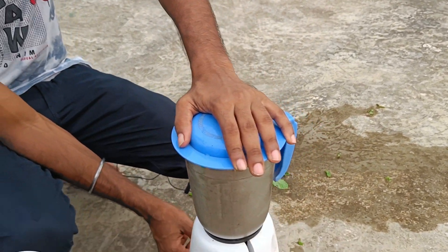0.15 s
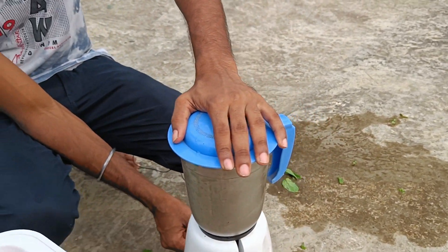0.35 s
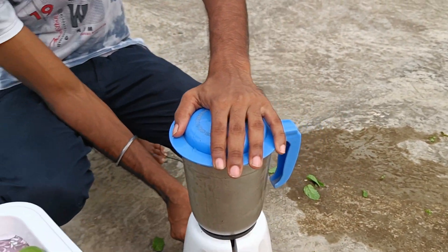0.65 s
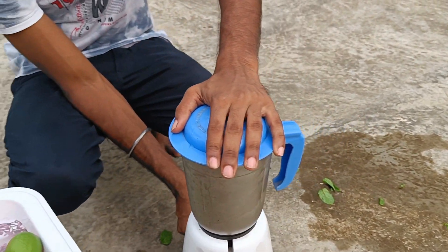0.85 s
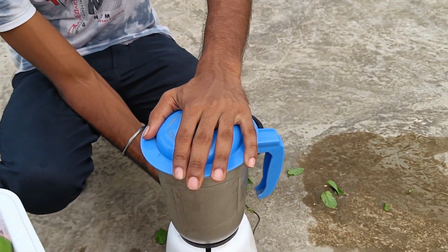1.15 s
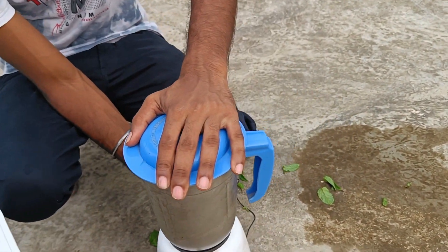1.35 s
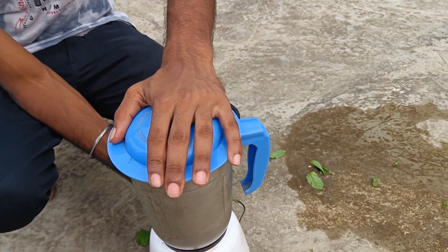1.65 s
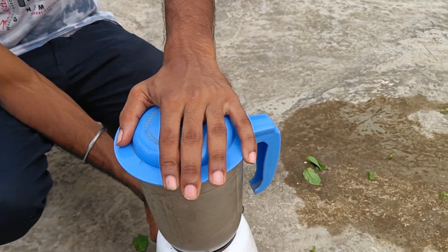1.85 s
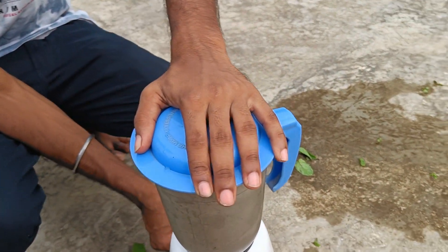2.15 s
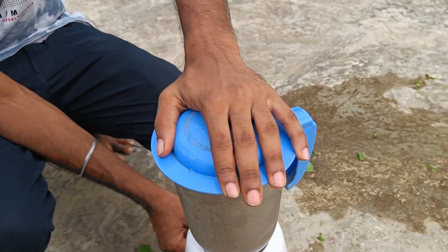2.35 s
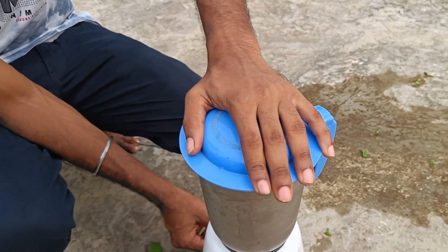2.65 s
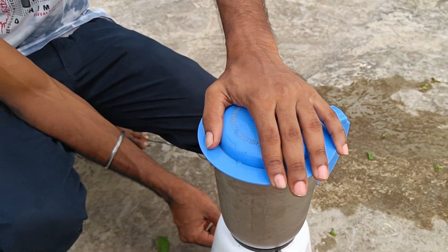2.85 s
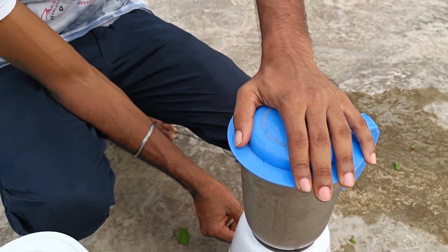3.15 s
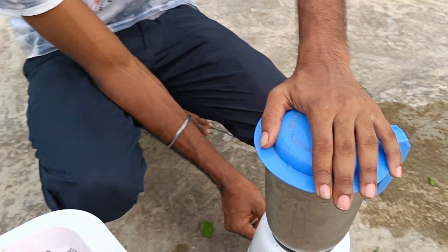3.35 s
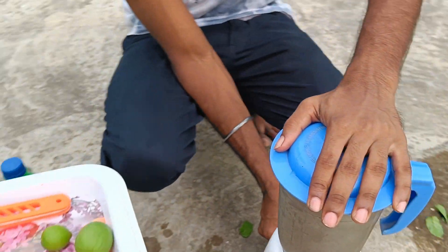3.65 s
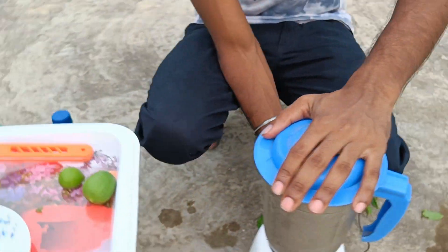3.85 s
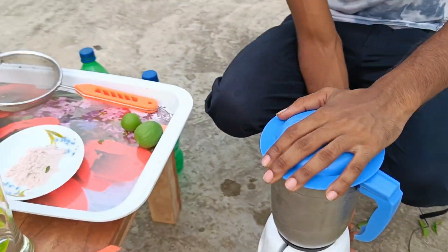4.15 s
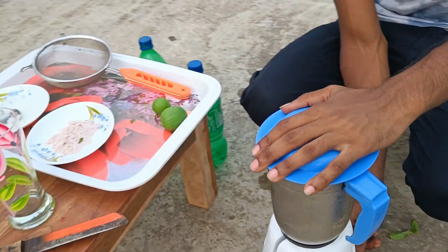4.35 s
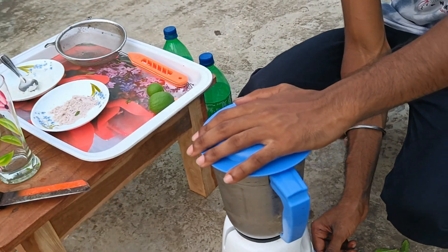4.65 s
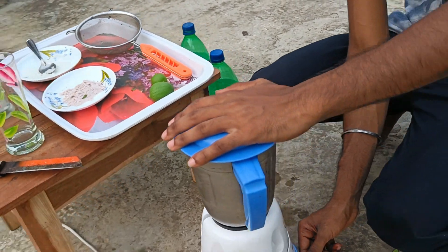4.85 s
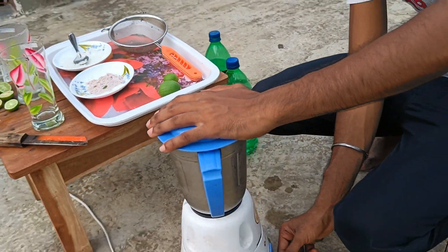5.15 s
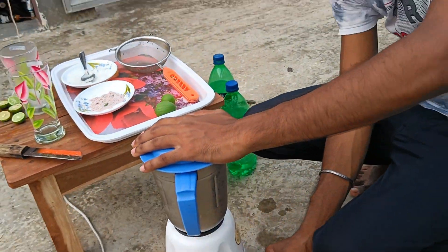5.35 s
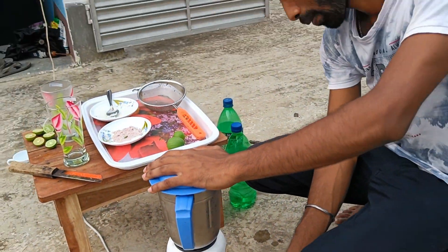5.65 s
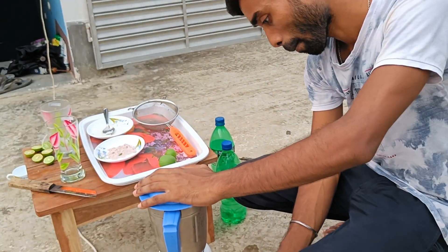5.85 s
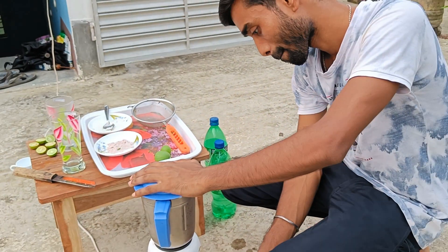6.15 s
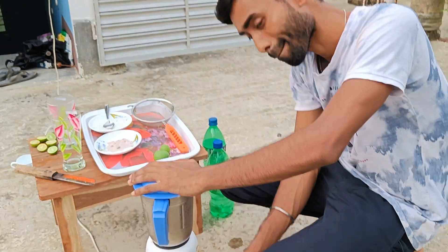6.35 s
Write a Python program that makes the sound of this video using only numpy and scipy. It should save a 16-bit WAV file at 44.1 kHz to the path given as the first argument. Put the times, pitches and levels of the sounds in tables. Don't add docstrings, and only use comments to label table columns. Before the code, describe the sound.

A mixer grinder is already at full speed, close to the microphone in an open yard. A harsh, high motor whine wavers about eight times a second over a dense wet churn and hiss. Ice snaps and chips tick on the steel jar. The mix turns smoother near four seconds, the sound recedes, and a tiny gap comes late.

```python
import sys
import numpy as np
from scipy import signal
from scipy.fft import rfft, irfft
from scipy.io import wavfile
from scipy.ndimage import uniform_filter1d, minimum_filter1d

SR = 44100
rng = np.random.default_rng(int(sys.argv[2]) if len(sys.argv) > 2 else 0)


def how_loud(loudness_db):
    steps = np.asarray(loudness_db, float) / 20
    return 10 ** steps


def master_out(mix):
    frames = np.transpose(np.atleast_2d(mix))
    ceiling = np.clip(frames, -1, 1)
    pcm = np.round(ceiling * 32767).astype(np.int16)
    wavfile.write(sys.argv[1], SR, pcm)


N = 286322
TIME_S = np.arange(N) / SR

# time in seconds, speed in Hz.
SPEED = [(0, 225.5), (.57, 223), (1.29, 222.7), (1.63, 219.8), (1.8, 216.3), (2.29, 214.3), (2.85, 214.3),
         (3.08, 212.7), (3.63, 214.2), (3.95, 214.6), (4.18, 210.5), (4.75, 211.5), (5.15, 209.9),
         (5.4, 207.2), (5.73, 210.4), (6.12, 211.5), (6.3, 207.5), (6.49, 208)]
# lowest speed at in seconds, laps so far, speed swing in Hz, churn swell in dB.
SWIRL = [(-.1, -1, 8.2, 1), (.055, 0, 8.2, 1), (.678, 4, 8.2, .5), (1.527, 10, 7.4, 3.5),
         (1.776, 12, 6.9, 4.2), (2.145, 15, 6.8, 2), (2.724, 20, 5.9, 3.3), (3.602, 28, 5, 3.5),
         (4.156, 33, 3.6, 3), (4.689, 38, 3.3, 1.9), (5.353, 44, 1.8, 1.2), (5.882, 47, 2.8, -.6),
         (6.106, 49, 1, 0), (6.415, 51, 2, 0), (6.57, 52, 3, 0)]
# time in seconds, speed change in Hz.
SLUMPS = [(1.1, -.4), (2.45, 1.05), (2.64, -1.22), (3.25, 0.95), (3.46, -.9), (3.64, .7), (4.34, 1.18),
          (4.56, -1.25), (4.72, .8), (4.93, -1.1), (5.27, -1), (5.55, -0.77), (5.9, -.9)]
# time in seconds, extra swell in dB.
ODD_LAPS = [(.52, -1.5), (1.39, -1), (1.53, 2.5), (2.26, 3.5), (2.49, 1.5), (2.72, -3), (2.83, 2.5),
            (2.94, -2.5), (3.16, 2.5), (3.39, -0.5), (3.5, -1.3), (3.6, 1.5), (3.72, -3), (3.93, 0.5),
            (4.48, 0), (5.01, -1.5)]


def shaft():
    rise_share = 0.56
    slump_s, lap_s = 0.0652, 0.07
    laps = curve(SWIRL, column=1)
    half_laps = 2 * np.floor(laps) + 1 + np.interp(laps % 1, [0, rise_share, 1], [0, 1, 2])
    swing_hz = curve(SWIRL, column=2) / 2 * np.cos(np.pi * half_laps)
    hz = curve(SPEED, column=1) + bumps(SLUMPS, slump_s) + swing_hz
    swell_db = curve(SWIRL, column=3) + bumps(ODD_LAPS, lap_s)
    load_db = np.sin(np.pi * (half_laps - .1)) * swell_db / 2
    falling = np.sin(np.pi * half_laps)
    return hz, load_db, falling


# cut in seconds, return in seconds, fade in seconds.
SPLICE = (5.3077, 5.3305, .018)
# time in seconds, depth in dB, length in seconds.
STUMBLES = [(3.981, 5.1, 0.027), (4.115, 4.8, 0.043), (4.335, 9.4, 0.05), (4.437, 5, 0.031),
            (4.755, 5.5, 0.036), (5.403, 5.3, 0.013), (5.469, 7.6, 0.017), (5.568, 7.4, 0.025),
            (5.643, 8.2, 0.018), (5.759, 6.5, 0.038), (6.047, 9.4, 0.014), (6.14, 6.0, 0.023),
            (6.27, 6.6, 0.014), (6.358, 5.7, 0.018), (6.424, 6.2, 0.017)]
# dB while grinding, share of nearness, extra dB on whole ice, extra dB once smooth.
HUM_DB = (-32, 0.43, 5, 2.5)


def motor(hz):
    before_cut = TIME_S < SPLICE[0]
    wander = np.where(before_cut, .001, .004) * drift(18.7) + 0.00091 * drift(71)
    turns = np.cumsum(hz * (1 + wander)) / SR
    stumble_db = 0
    for start_s, depth_db, length_s in STUMBLES:
        stumble_db = stumble_db + 1.15 * depth_db * np.exp(-(2.2 * (TIME_S - start_s) / length_s) ** 2)
    braking = np.maximum(-np.gradient(hz) * SR / 100, 0)
    flutter_db = np.where(before_cut, .6, 1.4) * drift(45)
    hum = how_loud(level(*HUM_DB) + 1.5 * drift(5.5)) * sine(turns)
    whine = slot_whine(hz, turns, damped_db=stumble_db + 1.9 * braking + flutter_db)
    whistle = brushes(turns, damped_db=6.8 * braking ** 2 + 0.72 * stumble_db + flutter_db)
    return np.sqrt(2) * (hum + whine + whistle)


RIPPLE_HZ = 100
# frequency in Hz, gain in dB.
HOUSING = [(2370, -20.5), (2440, -12.5), (2520, -14), (2560, -20), (2600, -39), (2625, -46), (2660, -36),
           (2700, -30), (2750, -42)]
TWIN_HOUSING = [(2370, -17.5), (2430, -8.5), (2500, -11.5), (2545, -14), (2575, -29), (2605, -47),
                (2645, -31)]
# dB while grinding, share of nearness, extra dB on whole ice, extra dB once smooth.
WHINE_DB = (6.5, 1.18, -1, 2)
TWIN_DB = (-3, 0.79, -4.5, 1)


def slot_whine(hz, turns, damped_db):
    slots = 12
    whine_hz, whine_turns = slots * hz, slots * turns
    housing_db = np.interp(whine_hz, *np.transpose(HOUSING))
    twin_housing_db = np.interp(whine_hz - RIPPLE_HZ, *np.transpose(TWIN_HOUSING))
    whine_db = level(*WHINE_DB) + housing_db + .8 * drift(30) - damped_db
    twin_db = level(*TWIN_DB) + twin_housing_db + .8 * drift(30) - damped_db
    return how_loud(whine_db) * sine(whine_turns) + how_loud(twin_db) * sine(whine_turns - RIPPLE_HZ * TIME_S)


# shaft multiple, level at the start in dB, level at the end in dB.
BRUSHES = [(23.6, 0.5, 0), (36.16, 2.5, 4.5), (48.2, -7.5, -10.5), (60, -24, -13), (72, -30, -24)]
# dB while grinding, share of nearness, extra dB on whole ice, extra dB once smooth.
BRUSH_DB = (-36.5, 1.65, -2, 0.5)


def brushes(turns, damped_db):
    spark_hz, spark_db_per_hz, flicker_db = 210.5, 2, 3.4
    whistle = 0
    for multiple, first_db, last_db in BRUSHES:
        whistle_db = np.linspace(first_db, last_db, N) + flicker_db * drift(45)
        whistle = whistle + how_loud(whistle_db) * sine(multiple * turns)
    sparks = 1 + 0.12 * np.cos(2 * np.pi * RIPPLE_HZ * TIME_S)
    slow_db = spark_db_per_hz * np.maximum(spark_hz - curve(SPEED, column=1), 0)
    return whistle * sparks * how_loud(level(*BRUSH_DB) - slow_db - damped_db)


# time in seconds, factor.
COARSE = [
    (0, 0.68),
    (.6, 1.2),
    (.9, 1.72),
    (3.6, 1.26),
    (4.1, 0.5),
    (6.49, 0.87),
]


def jar(hz, load_db, falling):
    turns = np.cumsum(hz) / SR
    beat = 1 + 0.053 * np.cos(2 * np.pi * turns)
    coarse = curve(COARSE, column=1)
    splash_db = load_db + 1.05 * coarse * drift(25)
    wet = churn(turns, splash_db) + hiss(beat, coarse, load_db, splash_db) + fizz(beat, splash_db)
    return blades(turns, load_db) + wet + boom(splash_db) + rumble(falling)


# shaft multiple, housing ring in Hz, width in Hz,
# pure share 0-1 at the start, pure share 0-1 at the end.
MAIN = [(2, 412, 38.6, 0.042, 0.42), (4, 851, 45, 0.13, 0.55), (5, 1079, 74.5, 0.085, 0.18),
        (6.05, 1317, 82, 0.36, 0.34)]
# dB while grinding, share of nearness, extra dB on whole ice, extra dB once smooth.
TONES_DB = [
    (-33.5, 0.85, 4, 9.5),
    (-16.5, 0.62, -6.5, -0.54),
    (-18.5, .8, -10, -4),
    (-13, 0.72, -4, -5),
]


def blades(turns, load_db):
    out = 0
    for (multiple, ring_hz, width_hz, first, last), tone_db in zip(MAIN, TONES_DB):
        pure = np.clip(np.linspace(first, last, N), 0, 1)
        smeared = fuzzy((multiple * turns + ring_hz * TIME_S) / 2, width_hz)
        tone = np.sqrt(2 * pure) * sine(multiple * turns) + np.sqrt(1 - pure) * smeared
        out = out + how_loud(level(*tone_db) - 1.0 + 0.17 * load_db) * tone
    return out


# shaft multiple, width in Hz, level over the churn in dB.
BLADES = [(3, 27.5, -12), (7, 54, -10.5), (8.1, 43, -13.5), (10, 26, -14), (14, 16, -18)]
# frequency in Hz, density in dB per Hz.
CHURN = [(500, -27), (700, -8.5), (900, 0), (1200, -2), (1500, -2.5), (1900, -4.5), (2300, -6.5),
         (2700, -11), (3200, -51)]
# dB while grinding, share of nearness, extra dB on whole ice, extra dB once smooth.
CHURN_DB = (-16.5, 0.86, -1.1, -3)


def churn(turns, splash_db):
    tones = sum(how_loud(db) * fuzzy(multiple * turns, width_hz) for multiple, width_hz, db in BLADES)
    wash = how_loud(3.5) * noise(CHURN, patchy_db=1.56)
    return how_loud(level(*CHURN_DB) + 1.26 * splash_db) * (wash + tones)


# frequency in Hz, density in dB per Hz.
HISS = [(1620, -15.5), (2750, 0.5), (2910, -5.5), (3210, -3), (3500, 0.5), (3800, -4.5), (4140, -0.5),
        (4340, -0.5), (5080, -7), (5610, -9), (6120, -14.5), (7190, -21), (7400, -11), (9620, -49),
        (16300, -120)]
# dB while grinding, share of nearness, extra dB on whole ice, extra dB once smooth.
HISS_DB = (-20, 1.05, 0.2, 0.1)


def hiss(beat, coarse, load_db, splash_db):
    spray = 0.99 * beat * noise(HISS, patchy_db=1.5)
    ice = coarse * (0.4 * grit(load_db) + 0.11 * crackle(load_db))
    return how_loud(level(*HISS_DB) + 0.95 * splash_db) * (spray + ice)


# frequency in Hz, level in dB, t60 in seconds.
JAR = [(3565, 3, 0.038), (4000, 1, 0.044), (4206, 5.5, 0.066), (4500, 3, 0.061), (4794, 3, 0.072),
       (5220, -20, 0.019), (5390, -1.5, 0.057), (6150, -29, 0.014), (8540, -10, 0.0097)]


def grit(load_db, per_s=700):
    strength = how_loud(1.8 * np.minimum(rng.exponential(1, N), 4))
    hits = strength * (rng.random(N) < per_s * how_loud(1.5 * load_db) / SR)
    which = rng.integers(0, len(JAR), N)
    out = 0
    for k, (hz, db, t60_s) in enumerate(JAR):
        out = out + how_loud(db) * signal.oaconvolve(hits * (which == k), ring(hz, t60_s))[:N]
    return evened(out)


def crackle(load_db, per_s=260):
    strength = how_loud(4.0 * np.minimum(rng.exponential(1, N), 4))
    ticks = strength * (rng.random(N) < per_s * how_loud(2.2 * load_db) / SR)
    band = signal.butter(4, [3000, 8800], "band", fs=SR)
    return evened(signal.lfilter(*band, ticks * rng.choice([-1, 1], N)))


# frequency in Hz, density in dB per Hz.
FIZZ = [(4120, -15), (7000, 0.5), (7410, -18), (7790, -9), (8440, -2), (9720, -11), (10500, -12),
        (11000, -14), (12800, -15.5), (13500, -22), (15600, -24)]
# dB while grinding, share of nearness, extra dB on whole ice, extra dB once smooth.
FIZZ_DB = (-38, 1.21, 0.2, 1.6)


def fizz(beat, splash_db):
    return how_loud(level(*FIZZ_DB) + 3.3 + .95 * splash_db) * beat * noise(FIZZ, patchy_db=.9)


# time in seconds, peak in dB, ring in Hz.
CHIPS = [(0.388, -23, 6700), (0.9622, -24, 7180), (1.4237, -19, 7900), (1.5155, -17.5, 7100),
         (1.712, -18, 7990), (1.9565, -26, 6290), (2.101, -12.5, 8400), (2.3406, -22, 8550),
         (2.9976, -19, 7770), (3.1158, -18, 7840), (3.4466, -15, 7600), (3.5119, -21, 7750),
         (4.3856, -18, 7630)]


def chips():
    length = 1500
    band = signal.butter(4, [3000, 9500], "band", fs=SR)
    fade = how_loud(-60 * np.arange(length) / SR / 0.038)
    out = np.zeros(N + length)
    for start_s, db, hz in CHIPS:
        tick = signal.lfilter(*band, rng.standard_normal(length)) * fade
        start = round(start_s * SR)
        out[start:start + length] += how_loud(db) * (0.61 * ring(hz, 0.016) + 0.66 * tick)
    return out[:N]


# time in seconds, peak in dB.
SNAPS = [(0.1151, -27), (0.1486, -32), (0.1835, -29), (0.8126, -24), (1.2394, -31), (2.1884, -34),
         (2.3406, -31), (2.7994, -33), (3.1198, -27), (3.4466, -30), (3.6486, -35), (4.3859, -31)]


def snaps():
    out = np.zeros(N)
    start_s, db = np.transpose(SNAPS)
    out[np.round(start_s * SR).astype(int)] = how_loud(db + 7)
    return signal.lfilter(*signal.butter(2, 7000, "high", fs=SR), out)


# frequency in Hz, density in dB per Hz.
BOOM = [(140, -31), (240, -12.5), (264, -12.5), (403, -1), (476, -7.5), (588, -9.5), (738, -11),
        (800, -5.5), (1040, -16.5), (1760, -120)]
# dB while grinding, share of nearness, extra dB on whole ice, extra dB once smooth.
BOOM_DB = (-22.5, 0.9, 2.5, 1)


def boom(splash_db):
    return how_loud(level(*BOOM_DB) + 1.5 + 0.11 * splash_db) * noise(BOOM, patchy_db=2.5)


# frequency in Hz, density in dB per Hz.
RUMBLE = [(15, -59), (25, -33), (54, -36), (93, -9.5), (113, -4.5), (136, -7.5), (182, -15), (190, -4),
          (250, -32), (420, -120)]


def rumble(falling):
    trend_db = np.interp(np.arange(N) / N, [0, .45, 1], [4.0, -1.5, -3.0])
    return how_loud(-45.5 + trend_db - 3.0 * np.roll(falling, 900)) * noise(RUMBLE, patchy_db=2.5)


# time in seconds, level in dB.
NEAR = [(0, 0), (.35, 0.5), (.75, -2.5), (1.4, -3), (2.1, -3), (2.5, -3.5), (2.8, -3.5), (3.2, -3.5),
        (3.7, -4.5), (4.3, -4.5), (5.1, -5.5), (5.6, -8), (6.2, -8.3), (6.49, -8.5)]
# from in seconds, to in seconds.
WHOLE_UNTIL = (0.53, 0.73)
GROUND_FROM = (3.58, 3.995)


def level(db, share, whole_db, smooth_db):
    whole = np.interp(TIME_S, WHOLE_UNTIL, [whole_db, 0])
    smooth = np.interp(TIME_S, GROUND_FROM, [0, smooth_db])
    return db + share * curve(NEAR, column=1) + whole + smooth


def noise(points, patchy_db):
    real, imag, patches = rng.standard_normal((N // 128 + 5, 257, 3)).T
    patches = uniform_filter1d(patches, 6, axis=0)
    patches = evened(uniform_filter1d(patches, 14, axis=1))
    frames = (real + 1j * imag) * how_loud(patchy_db * patches)
    flat = signal.istft(frames, nperseg=512, noverlap=384)[1][:N]
    hz, db = np.transpose(points)
    fine_hz = np.fft.rfftfreq(N, 1 / SR)
    shape_db = np.interp(np.log(fine_hz + 1), np.log(hz + 1), db, -90, -90)
    return evened(irfft(rfft(flat) * how_loud(shape_db), N))


def fuzzy(turns, width_hz):
    r = np.exp(-np.pi * width_hz / SR)
    slow = signal.lfilter([1], [1, -2 * r, r * r], rng.standard_normal((N, 2)) @ [1, 1j])
    return evened((slow * np.exp(2j * np.pi * turns)).real)


def ring(hz, t60_s):
    t = np.arange(1500) / SR
    return np.sin(2 * np.pi * hz * t) * how_loud(-60 * t / t60_s) * np.minimum(t / 0.00025, 1)


def sine(turns):
    return np.sin(2 * np.pi * turns)


def drift(hz):
    slow = signal.lfilter(*signal.butter(2, hz, fs=SR / 32), rng.standard_normal(N // 32 + 2))
    return evened(np.interp(np.arange(N) / 32, np.arange(len(slow)), slow))


def bumps(rows, spread_s):
    return sum(height * np.exp(-((TIME_S - at_s) / spread_s) ** 2 / 2) for at_s, height in rows)


def curve(rows, column):
    rows = np.array(rows)
    return np.interp(TIME_S, rows[:, 0], rows[:, column])


def evened(x):
    return x / np.sqrt(np.mean(x ** 2) + 1e-20)


def scene():
    hz, load_db, falling = shaft()
    return (motor(hz) + jar(hz, load_db, falling) + chips() + snaps())[None]


def top_cut(x):
    return signal.sosfilt(signal.butter(12, 15720, fs=SR, output="sos"), x)


def record(dry):
    cut_s, back_s, fade_s = SPLICE
    fade_in = np.sin(np.pi / 2 * np.clip((TIME_S - back_s) / fade_s, 0, 1)) ** 2
    gate = np.where(TIME_S < cut_s, 1, fade_in)
    over = np.maximum(abs(dry) - .6, 0)
    wanted = (.6 + .36 * np.tanh(over / .36)) / (.6 + over)
    gain = uniform_filter1d(minimum_filter1d(wanted, size=41), size=41)
    return top_cut(dry * gain * gate)


dry = scene()
out = record(dry)
master_out(out)
```